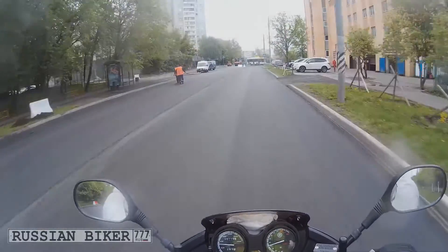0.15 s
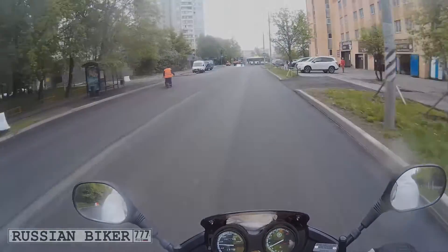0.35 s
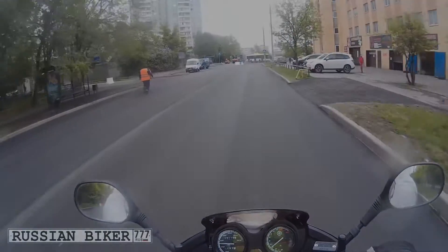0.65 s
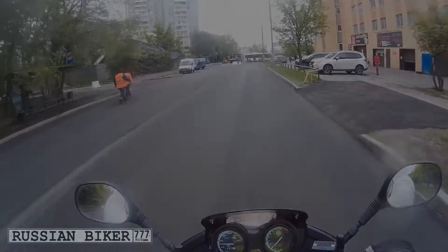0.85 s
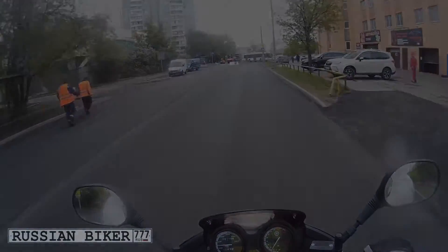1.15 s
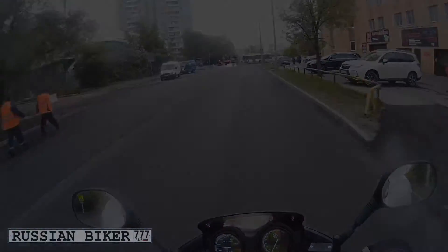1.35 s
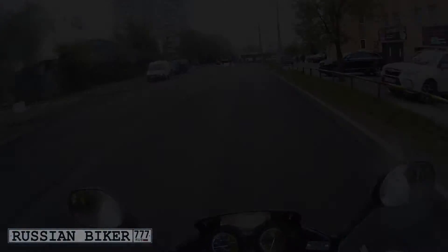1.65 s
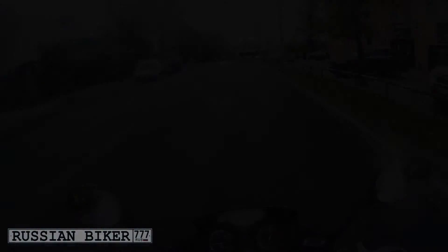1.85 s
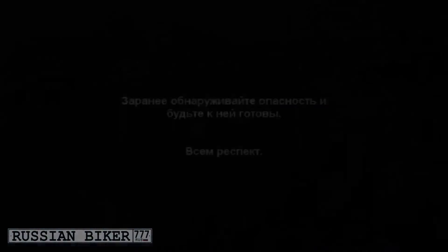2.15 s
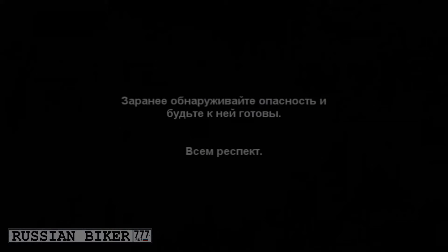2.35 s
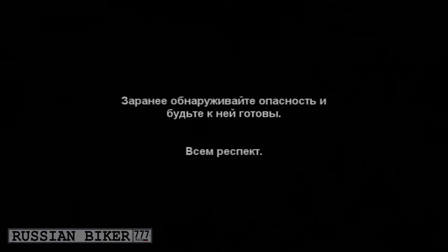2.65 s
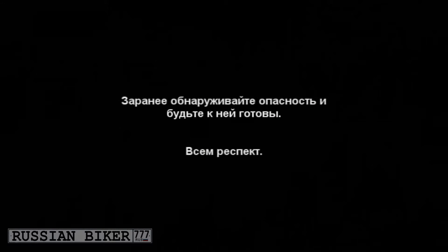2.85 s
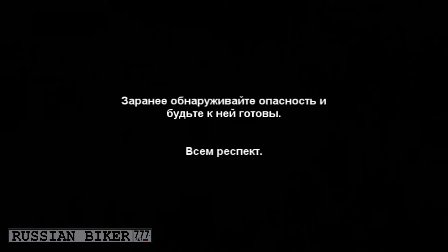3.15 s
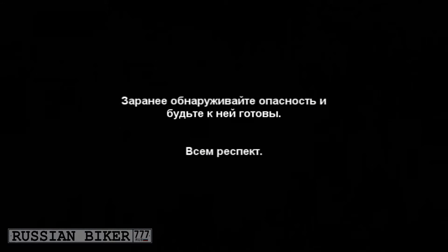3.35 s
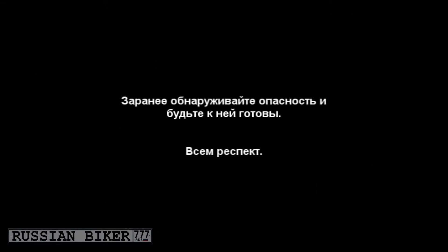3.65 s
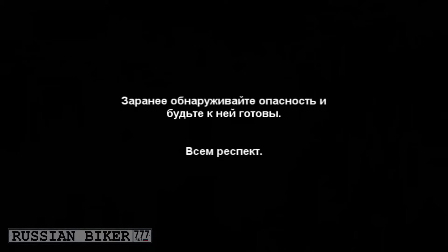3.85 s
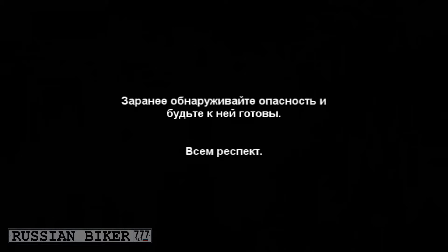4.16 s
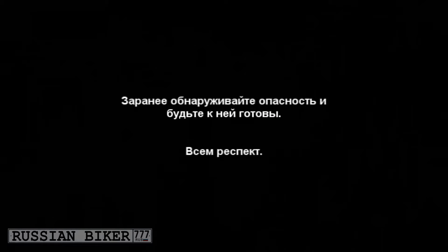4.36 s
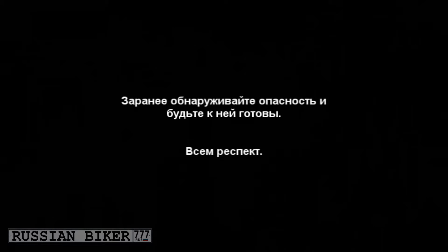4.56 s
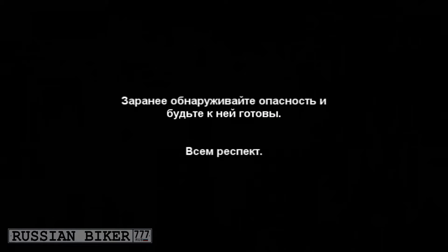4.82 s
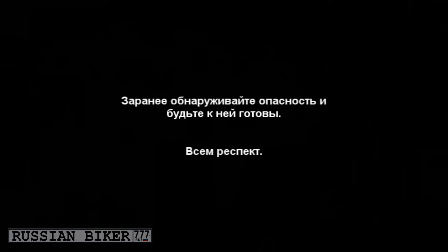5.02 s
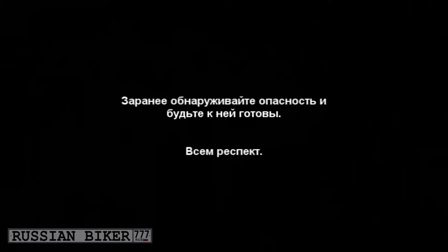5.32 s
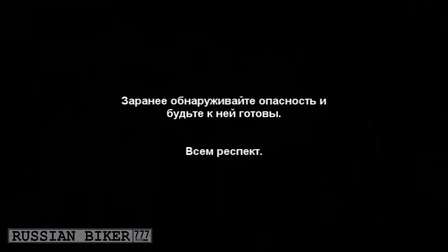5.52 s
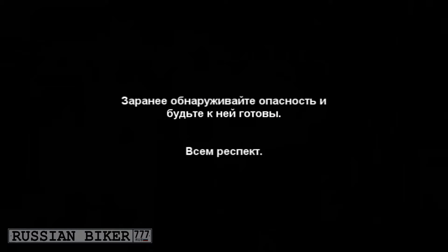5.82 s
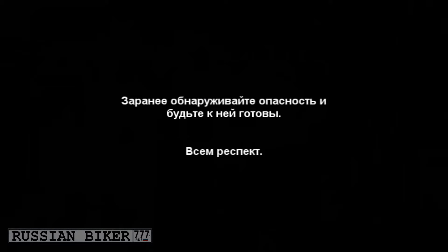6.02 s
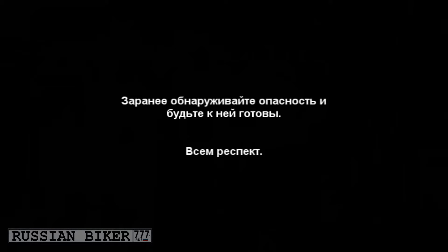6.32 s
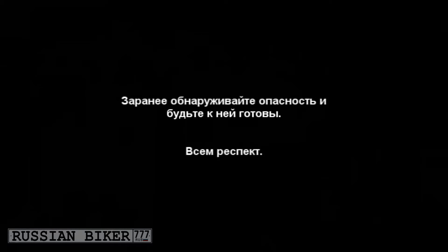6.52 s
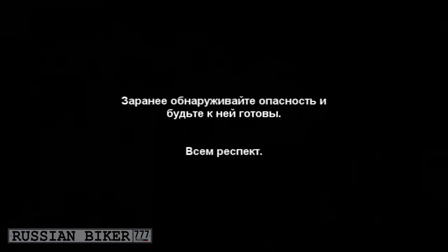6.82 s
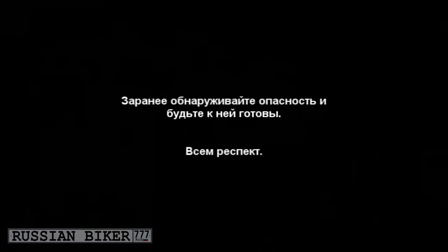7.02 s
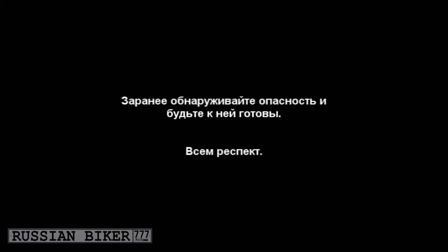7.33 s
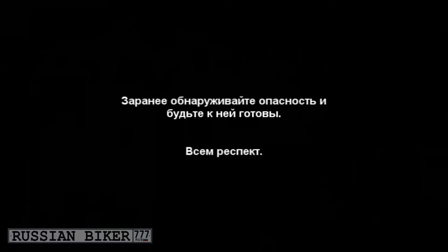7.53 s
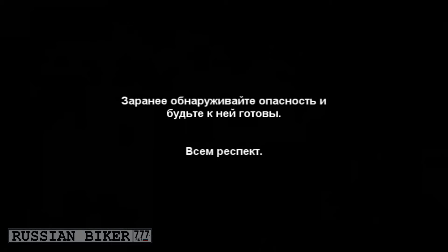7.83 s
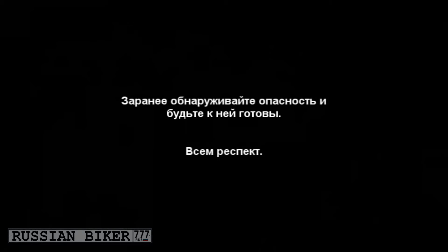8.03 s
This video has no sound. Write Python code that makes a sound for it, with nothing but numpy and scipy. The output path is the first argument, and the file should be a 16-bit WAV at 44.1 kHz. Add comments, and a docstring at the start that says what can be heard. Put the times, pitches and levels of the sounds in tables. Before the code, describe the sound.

From 0 s, a motorcycle is heard from the rider's seat: strong wind buffets the microphone, tyres hiss brightly on a wet street, a rough engine surges briefly then backs off, and a fluttering mid-pitched gear whine slides downward. Spray drops tick around 0.6, 1.5 and 2 s. Between 0.9 and 2.1 s the bright open roar fades smoothly, leaving deep uneven wind thumps and a dull, hollow air rush, as inside a closed camera housing. The whine dies by about 3.4 s. Short hollow rattles of the mount come near 3.7, 4.2, 5 and 5.7 s. From 4.3 s braking weakens the wind and its boom faster; a faint, thin hiss rises around 5.5 s. The strongest rattle cluster hits at 7.2 s, with further knocks at 7.4 and 8 s, while low, pulsing engine idle hum emerges from about 7 s over the softened rumble.

```python
"""Wind buffets the microphone, tyres hiss on a wet street and a gear whine sinks: a motorcycle from the rider's seat.
In about two seconds the open sound fades into a muffled one, as from inside a closed camera housing.
The bike slows, the wind rumble eases, the engine hum comes through, and bumps rattle the mount.
Air, tyres and rattle are coloured noise; whine, engine and boom are wavering sines.
Knocks and drops of spray are short rings that die away."""
import sys
import numpy as np
from scipy import signal
from scipy.fft import rfft, irfft, next_fast_len
from scipy.io import wavfile
from scipy.ndimage import uniform_filter1d

SR = 44100
rng = np.random.default_rng(int(sys.argv[2]) if len(sys.argv) > 2 else 0)


def wav_record(signal):
    """Record a signal, one row per channel, as 16-bit PCM in the file named by sys.argv[1]."""
    frames = np.transpose(np.atleast_2d(signal))
    bounded = np.clip(frames, -1, 1)
    # unit amplitude maps onto the largest positive 16-bit level
    quanta = np.round(bounded * 32767).astype(np.int16)
    wavfile.write(sys.argv[1], SR, quanta)


N = 360738
TIME = np.arange(N) / SR   # seconds


def from_db(db):
    """Turn decibels into gain."""
    return 10 ** (np.asarray(db) / 20)


def rms_one(x):
    """Scale to an average strength (rms) of 1."""
    return x / np.sqrt(np.mean(x ** 2) + 1e-20)


def in_time(rows):
    """Draw straight lines between the rows; give each column sample by sample."""
    s, *columns = np.transpose(rows)
    return [np.interp(TIME, s, column) for column in columns]


def drift(rate):
    """Slow random wandering with spread 1; a higher rate wanders faster."""
    # made at one fortieth of the sample rate, then filled in by straight lines
    pole = np.exp(-80 * np.pi * rate / SR)
    chance = rng.standard_normal(N // 40 + 2002)
    slow = signal.lfilter([1], [1, -2 * pole, pole * pole], chance)[2000:]   # skip the start-up
    return np.interp(np.arange(N) / 40, np.arange(len(slow)), rms_one(slow))


def noise(spectrum):
    """Noise of a given colour, falling steeply beyond its ends; rms 1."""
    size = next_fast_len(N)
    octave = np.log2(np.maximum(np.arange(size // 2 + 1) * SR / size, 1))
    hz, db = np.transpose(spectrum)
    outside = np.abs(octave - np.clip(octave, np.log2(hz[0]), np.log2(hz[-1])))
    gain = from_db(np.interp(octave, np.log2(hz), db) - 51 * outside)   # 51 dB per octave
    white = rng.standard_normal(size)
    return rms_one(irfft(rfft(white) * gain, size)[:N])


def low_pass(x, hz):
    """Second-order low-pass."""
    return signal.sosfilt(signal.butter(2, hz, fs=SR, output="sos"), x)


def band_without_delay(x, hz, kind="low"):
    """Take the part below or above hz, filtering forwards and backwards so it stays in step."""
    return signal.sosfiltfilt(signal.butter(2, hz, kind, fs=SR, output="sos"), x)


def even(x, span_s):
    """Flatten the swells of a noise that last longer than span_s."""
    return x / np.sqrt(uniform_filter1d(x ** 2, max(int(span_s * SR), 2)) + 1e-9)


def eddies(depth_db, rate):
    """Gain of turbulent air: lumps of pressure that leave the mean power of the gain at 1."""
    return rms_one(from_db(depth_db * np.clip(drift(rate), -2, 2)))


# Colour of the faint hiss: f/Hz, level/dB (per Hz)
HISS_COLOUR = [(1500, 2), (4500, 2), (7000, -1), (11000, -3), (15500, -9.5)]
FAINT_HISS_DB, HISS_RISE_DB = -77.5, 8
HISS_RISE_S, HISS_RISE_LENGTH_S = 5.5, 0.36   # middle of the rise, and how gradual it is


def faint_hiss():
    """A thin, even hiss that steps up smoothly as the bike slows."""
    risen = (1 + np.tanh((TIME - HISS_RISE_S) / HISS_RISE_LENGTH_S)) / 2
    return from_db(FAINT_HISS_DB + HISS_RISE_DB * risen) * noise(HISS_COLOUR)


# The headwind eases slowly, then faster once the bike brakes
BRAKE_S, COAST_DB_PER_S, BRAKE_DB_PER_S = 4.27, 1.01, 3


def braking_db():
    """What braking has taken off the headwind."""
    return BRAKE_DB_PER_S * np.maximum(TIME - BRAKE_S, 0)


def headwind_db():
    """Strength of the headwind against that at full speed."""
    return -COAST_DB_PER_S * np.minimum(TIME, BRAKE_S) - braking_db()


# Gusts and lulls: t/s, length/s, lift of the thumping/dB, lift of the rush/dB
GUSTS = [(0.234, .35, -2.5, 0), (0.57, 0.18, 3, -8), (1.164, 0.27, 3, 2), (1.46, 0.35, 1.5, -4.5),
         (1.746, 0.11, 3, 0.5), (2.086, 0.059, -7.5, -3), (2.217, 0.13, 2.5, 2.5), (2.381, 0.12, -5.5, 1),
         (2.603, 0.066, 4, 1), (2.901, 0.11, -0.5, -2), (3.206, 0.26, 1, -0.5), (3.76, 0.13, 1, 0),
         (3.97, 0.11, 1, 2.5), (4.43, .12, 1, -1), (4.6, 0.054, -7, -2.5), (4.717, 0.19, -1.5, 1),
         (5.0, 0.092, 2.5, -0.5), (5.25, 0.22, -2, 0.5), (5.773, 0.29, 2, 2.5), (6.046, 0.038, 3, 3),
         (6.392, 0.092, 4, 2.5), (6.828, 0.099, 7, 2.5), (6.95, 0.098, -10, 0.5), (7.22, 0.15, 3.5, 0.5),
         (7.45, 0.24, -1, 0.5), (7.68, 0.19, -3, -1), (7.904, 0.16, 0, -1)]


def gusts_db():
    """Each gust or lull is a smooth hump; gives the lift of the thumping and that of the rush."""
    lifts = 0
    for s, length, thump_db, rush_db in GUSTS:
        hump = np.exp(-(2 * (TIME - s) / length) ** 2)
        lifts = lifts + np.outer([thump_db, rush_db], hump)
    return lifts


# Colour of the low thumping: f/Hz, level/dB (per Hz)
BUFFET_COLOUR = [(10, -13.5), (22, -0.5), (45, -2), (80, -1), (115, -4.5), (155, -6), (205, -14.5),
                 (320, -18.5), (600, -31.5), (1000, -60.5)]
BUFFET_DB = -20   # at full speed, before gusts
# Rate at which eddies are shed, its spread as a share, level against the thumping before braking
BOOM_HZ, BOOM_WANDER, BOOM_DB = 46.25, 0.22, -4.5


def buffeting(deep_hz=48):
    """Eddies shed by screen and rider thump the camera, partly in a wavering boom; weak ones lack depth."""
    lift_db, _ = gusts_db()
    wind_db = headwind_db() + lift_db
    thumps = noise(BUFFET_COLOUR) * eddies(depth_db=1.8, rate=25)
    deep = band_without_delay(thumps, deep_hz)
    thumps = thumps - deep + deep * from_db(0.28 * wind_db)
    turn = np.cumsum(BOOM_HZ * (1 + BOOM_WANDER * drift(9))) / SR
    boom = eddies(depth_db=3.0, rate=6.2) * np.sqrt(2) * np.sin(2 * np.pi * turn)
    boom = from_db(BOOM_DB - 0.87 * braking_db()) * boom
    return from_db(BUFFET_DB + wind_db) * even(thumps + boom, span_s=0.2)


FADE_START_S, FADE_END_S = 0.91, 2.134   # the open air fades away in a straight line


def openness():
    """Share of the open air that is still heard, from 1 to 0."""
    return np.interp(TIME, [FADE_START_S, FADE_END_S], [1, 0])


# Colour of the wind on the bare microphone: f/Hz, level/dB (per Hz)
OPEN_WIND_COLOUR = [(80, -29), (135, -0.5), (220, -1), (330, 2), (440, 1.5), (620, -3.5), (840, -6),
                    (1100, -10.5), (1500, -38)]
# Colour of the hiss of the wet road: f/Hz, level/dB (per Hz)
TYRE_HISS_COLOUR = [(700, -10.5), (1300, 1.5), (2350, 1), (2850, -3.5), (3950, -3), (4400, -11),
                    (5100, -13), (6100, -10), (7700, -18), (8700, -32.5), (9500, -22), (11600, -32.5),
                    (12600, -58), (15500, -43)]
OPEN_WIND_DB, OPEN_HISS_DB = -18, -28.5   # before the fade
WIND_FADE_POWER = 0.83   # the roar lingers a little longer than the hiss


def open_ride():
    """Wind beats on the bare microphone; the tyres tear fine spray off the road."""
    wind = from_db(OPEN_WIND_DB) * noise(OPEN_WIND_COLOUR) * eddies(depth_db=1.26, rate=63)
    hiss = from_db(OPEN_HISS_DB) * noise(TYRE_HISS_COLOUR) * eddies(depth_db=0.46, rate=210)
    return openness() ** WIND_FADE_POWER * wind + openness() * hiss


# Air resonances of the housing: f/Hz, width/Hz, level/dB, strongest at t/s, length/s
HOUSING = [(478, 17, 2, 6.6, 1.6), (540, 99, -8, 5.4, 1.8), (675, 120, -11, 3, 5), (818, 53, 1.5, 8.2, 5.1),
           (1333, 36, 1.5, 7.3, 3.3), (1520, 160, -2.5, 5.3, 4.5)]


def housing(x):
    """The small air space of the housing rings along; each resonance swells and fades with the airflow."""
    out = x
    for hz, width_hz, db, s, length in HOUSING:
        swell = np.exp(-(2 * (TIME - s) / length) ** 2)
        ring = signal.lfilter(*signal.iirpeak(hz, hz / width_hz, fs=SR), x)
        out = out + from_db(db) * swell * ring
    return rms_one(out)


# Inside the housing, levels before the lifts below:
# t/s, level of the air rush/dB, level of the shell rustle/dB
CLOSED_RIDE = [(2.25, -30.5, -50.5), (2.8, -30.5, -52.5), (3.7, -31.5, -56.5), (4.3, -29.5, -55),
               (5.1, -27, -52.5), (5.4, -30, -56), (6.0, -29, -53.5), (6.55, -31.5, -54.5),
               (8.18, -35, -51.5)]
# Colour of the dull air rush: f/Hz, level/dB (per Hz)
RUSH_COLOUR = [(80, -21.5), (180, 2), (260, 1.5), (370, -0.5), (500, -0.5), (590, 0), (720, -1), (820, -6),
               (950, -12), (1150, -19.5), (1500, -36.5), (2500, -61.5)]
# Colour of the rustling shell: f/Hz, level/dB (per Hz)
SHELL_COLOUR = [(800, 3.5), (1250, 2), (1550, -1.5), (1800, -1.5), (2250, -5), (2550, -12.5), (3000, -20),
                (3700, -28.5), (4500, -39), (7000, -59)]
# Starting tilt of the rush, and its change with each dB that braking takes off the wind
RUSH_TILT_DB, TILT_PER_DB = -2.5, 0.59
# The rustle gains treble above this pitch with each dB that braking takes off the wind
SHELL_BRIGHT_HZ, SHELL_BRIGHT_PER_DB = 3000, 0.32


def closed_ride(fade_start=0.41, fade_end=1.6):
    """Through the housing only a dull rush and the rustle of the shell are left."""
    rush_db, shell_db = in_time(CLOSED_RIDE)
    _, lift_db = gusts_db()
    eddy = np.clip(drift(36), -2, 2)   # one eddy shakes rush and shell at once
    eddy = eddy * from_db(0.5 * headwind_db())   # slower air is smoother

    rush = even(housing(noise(RUSH_COLOUR)) * eddies(depth_db=1.05, rate=82), span_s=0.097)
    low = band_without_delay(rush, 430)
    tilt_db = RUSH_TILT_DB + TILT_PER_DB * braking_db()   # positive: less bass, more treble
    rush = low * from_db(-tilt_db) + (rush - low) * from_db(tilt_db / 2)
    rush = from_db(rush_db + lift_db + 3.5 + 1.68 * eddy) * rush

    shell = from_db(shell_db + 0.73 * lift_db + 4.0 + 2.6 * eddy) * housing(noise(SHELL_COLOUR))
    treble = band_without_delay(shell, SHELL_BRIGHT_HZ, "high")
    shell = shell + (from_db(SHELL_BRIGHT_PER_DB * braking_db()) - 1) * treble
    return np.interp(TIME, [fade_start, fade_end], [0, 1]) * (rush + shell)


# Drops of spray on the camera: t/s, level/dB, splash against ring, ring f/Hz, ring decay/s
DROPS = [(0.607, -26, 2.6, 7300, 0.00075), (.85, -41, .6, 10600, .0012), (1.496, -36, 0.65, 10400, .0012),
         (1.9645, -26, .95, 2995, 0.00082), (3.782, -56, 0.94, 4070, .0012),
         (4.175, -48.5, .4, 4120, 0.0014), (4.986, -55, .8, 4000, .0012), (6.676, -48, .12, 3920, .003),
         (7.148, -53, 0.098, 4150, .0018)]


def drops(splash_s=0.0009, splash_hz=6000):
    """A drop lands with a tiny splash and a short, high ring."""
    out = np.zeros(N)
    age = np.arange(SR // 50) / SR
    for s, db, share, hz, ring_s in DROPS:
        ring = np.sin(2 * np.pi * hz * age) * np.exp(-age / ring_s)
        splash = share * rng.standard_normal(len(age)) * np.exp(-age / splash_s)
        at = round(s * SR)
        out[at:at + len(age)] += from_db(db) * (ring + low_pass(splash, splash_hz))
    return out


# Bumps that rattle the mount: t/s, level/dB, decay/s
BUMPS = [(3.692, -31, 0.012), (3.766, -39, .02), (4.182, -33, 0.012), (4.227, -35.5, 0.01),
         (4.301, -38, .014), (4.951, -28, 0.022), (5.005, -37, .03), (5.052, -40, 0.034), (5.095, -33, .02),
         (5.672, -31.5, 0.018), (5.701, -25.5, 0.013), (5.716, -31, .012), (5.823, -29, 0.0079),
         (7.158, -27, 0.015), (7.167, -30, 0.018), (7.228, -24.5, 0.011), (7.233, -24.5, 0.0097),
         (7.247, -34, 0.039), (7.395, -29, 0.012), (8.031, -29.5, 0.013)]
# Ringing tones of the mount and camera body: f/Hz, typical level/dB, decay/s
MOUNT_MODES = [(317, -3.5, 0.0073), (480, -6, 0.0079), (664, -1.5, 0.0078), (1160, -13.5, 0.0073),
               (1556, -13.5, .007), (1950, -18.5, 0.0078), (2240, -22.5, 0.0053), (2970, -26, 0.0042)]
# Colour of the chattering mount: f/Hz, level/dB (per Hz)
CHATTER_COLOUR = [(110, 8), (200, 8), (400, 18), (750, 20.5), (1100, 5.5), (1600, 3), (2300, -5),
                  (3200, -16), (4200, -25.5), (5200, -29.5), (7000, -37.5), (12000, -48.5)]


def bumps(rise_s=0.00097):
    """Each bump knocks the mount, which rings short and hollow and chatters for some hundredths of a second."""
    shake, knocks = np.zeros(N + SR), np.zeros(N + SR)
    age = np.arange(SR // 4) / SR
    for s, db, decay_s in BUMPS:
        at = round(s * SR)
        span = slice(at, at + len(age))
        force = from_db(db) * (1 - np.exp(-age / rise_s))
        shake[span] += force * np.exp(-age / decay_s)
        for hz, mode_db, ring_s in MOUNT_MODES:
            strength = from_db(mode_db + 2 * rng.standard_normal())   # no two knocks alike
            tone = np.sin(2 * np.pi * (hz * age + rng.random()))
            knocks[span] += force * strength * np.exp(-age / ring_s) * tone
    chatter = even(noise(CHATTER_COLOUR) * eddies(depth_db=2.5, rate=900), span_s=0.0057)
    return knocks[:N] + shake[:N] * chatter


# Gear whine, sinking with road speed: t/s, middle f/Hz, level/dB
WHINE = [(0, 634, -28), (.48, 620, -31.5), (.8, 604, -39), (1.1, 585, -29.5), (1.35, 569.6, -31),
         (1.57, 556, -26), (1.64, 546, -37), (1.8, 531, -29), (2.05, 517, -37), (2.2, 513, -47),
         (2.42, 496, -38), (2.9, 456.4, -40), (3.4, 436, -72.5)]


def gear_whine():
    """Meshing teeth give one line that sinks with the speed and flutters."""
    hz, db = in_time(WHINE)
    turn = np.cumsum(hz * (1 + 0.0054 * drift(30))) / SR
    return from_db(db) * eddies(depth_db=3.0, rate=21) * np.sqrt(2) * np.sin(2 * np.pi * turn)


# Engine, throttle closed early and down to idle at the end:
# t/s, working cycles per second f/Hz, overall level/dB, lift of the firing note/dB
ENGINE = [(0, 54, -22, -4), (.12, 62, -21, 0), (.32, 72, -23.5, 0.5), (.39, 59.5, -30.5, 5),
          (.56, 61.5, -22.5, 1), (.85, 55, -28, 0.5), (1.2, 49, -33, 2.5), (2.1, 39.3, -46, 0.5),
          (6.8, 30, -41, -1), (6.98, 29.7, -36.5, 3), (7.35, 29.5, -33, -9), (7.62, 29.6, -31.5, -1),
          (7.74, 29.5, -41, 15), (7.92, 29.7, -34, 4), (8.18, 29.2, -42, 8)]
# Tones of the engine: multiple of the cycle rate, level under throttle/dB, level at idle/dB
ENGINE_ORDERS = [(0.985, -8.5, -27.5), (1.998, -0.5, -6), (3, -11, -10), (4, -11.5, -12.5), (7, -17, -11.5),
                 (9.98, -19.5, -11), (14.07, -26, -13), (21.85, -26.5, -10.5), (25.7, -31, -11),
                 (28.15, -31.5, -9.5)]
IDLE_CYCLES_PER_S, PULL_CYCLES_PER_S = 30, 48   # at idle, and from here on fully under throttle
PIPE_HZ, PIPE_WIDTH_HZ, PIPE_DB = 211, 20, 9.5   # resonance of the exhaust pipe


def engine():
    """Unsteady multiples of the working cycle; the exhaust pipe lifts those near its resonance."""
    cycles, db, firing_db = in_time(ENGINE)
    pull = (cycles - IDLE_CYCLES_PER_S) / (PULL_CYCLES_PER_S - IDLE_CYCLES_PER_S)
    pull = np.clip(pull, 0, 1)
    roughness = 0.004 + 0.0195 * pull   # rougher under throttle
    turn = np.cumsum(cycles * (1 + roughness * drift(13.9))) / SR
    hum = 0
    for order, pull_db, idle_db in ENGINE_ORDERS:
        order_db = idle_db + pull * (pull_db - idle_db)
        if round(order) == 2:   # two firings a cycle
            order_db = order_db + firing_db
        pipe_db = PIPE_DB / (1 + ((order * cycles - PIPE_HZ) / PIPE_WIDTH_HZ) ** 2)
        waver_db = (1.0 + 1.9 * pull) * drift(14)
        tone = np.sin(2 * np.pi * (order * turn + rng.random()))
        hum = hum + from_db(order_db + pipe_db + waver_db) * tone
    return from_db(db) * hum


def scene():
    """Air, road and machine, over a faint hiss."""
    air = buffeting() + open_ride() + closed_ride()
    return (faint_hiss() + air + drops() + bumps() + gear_whine() + engine())[None]


CUTOFF_HZ = 15700


def record(dry):
    """A steep low-pass cuts the top of the treble."""
    return signal.sosfilt(signal.ellip(10, 0.1, 80, CUTOFF_HZ, fs=SR, output="sos"), dry)


dry = scene()
out = record(dry)
wav_record(out)
```